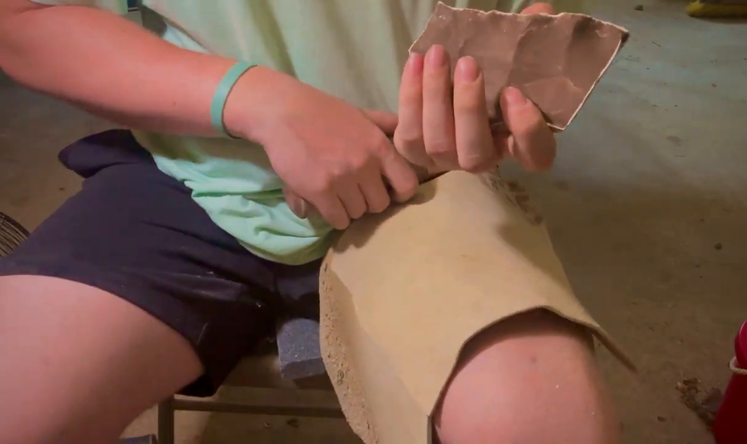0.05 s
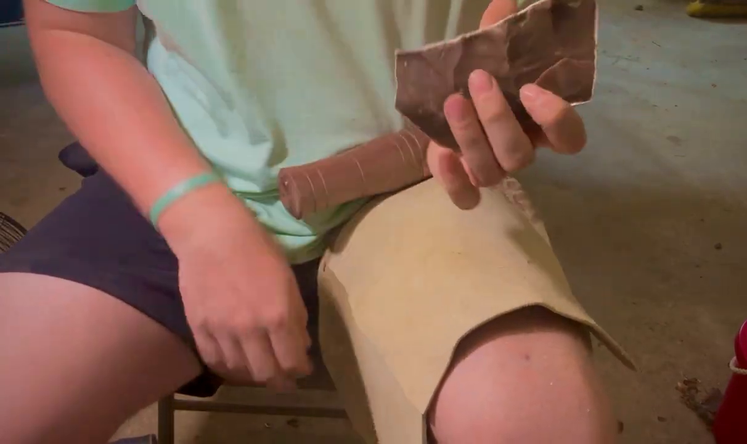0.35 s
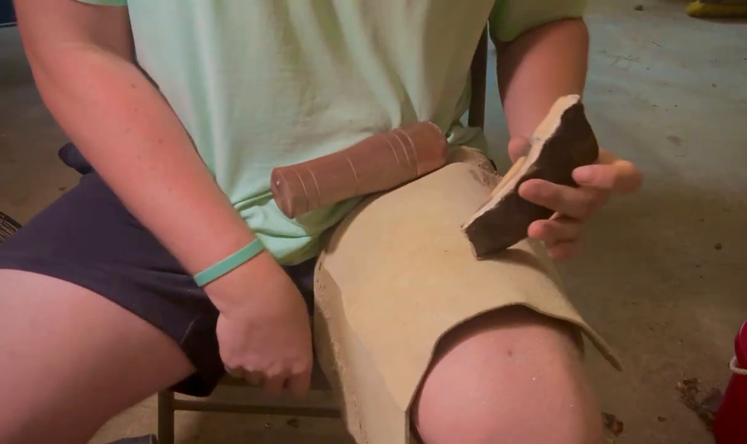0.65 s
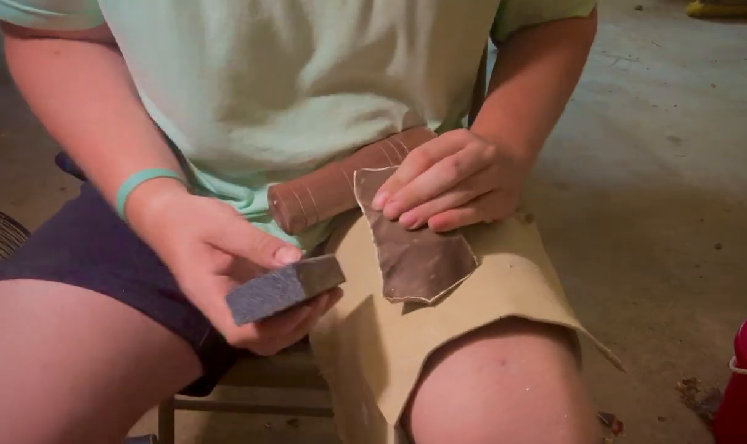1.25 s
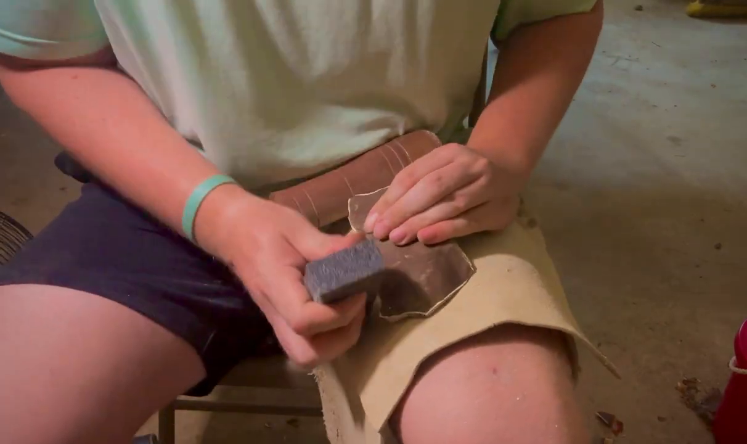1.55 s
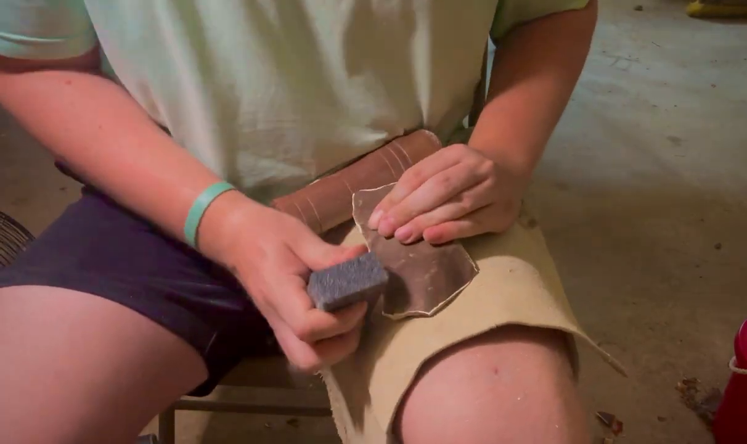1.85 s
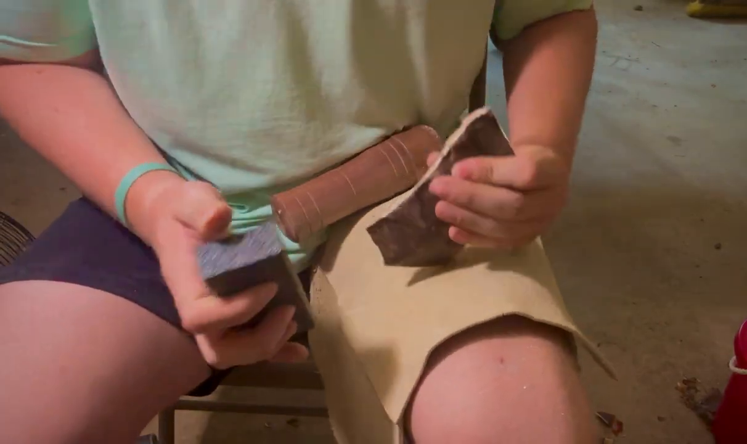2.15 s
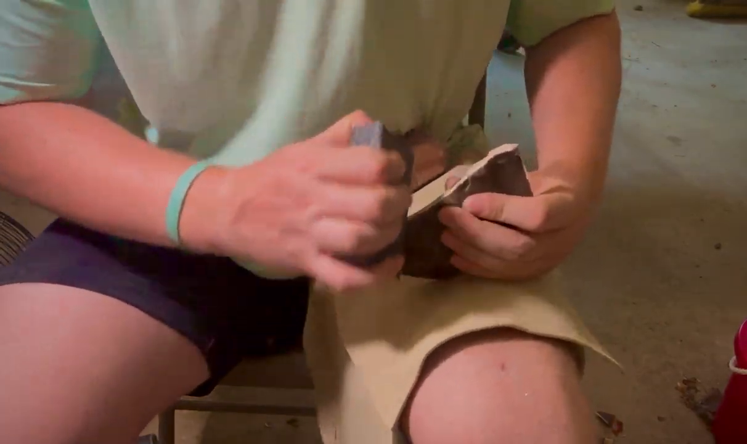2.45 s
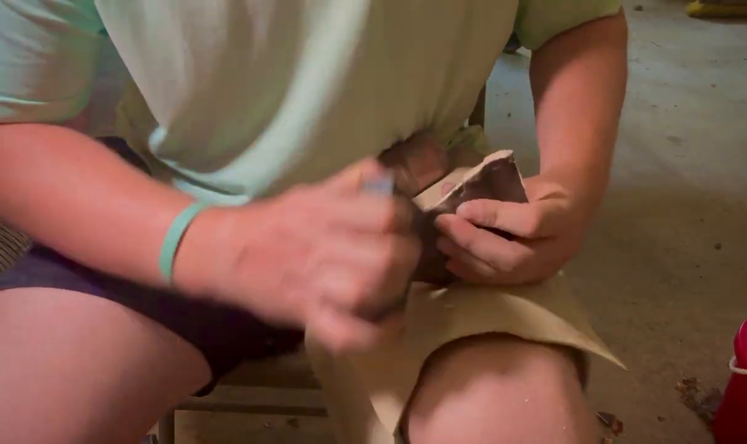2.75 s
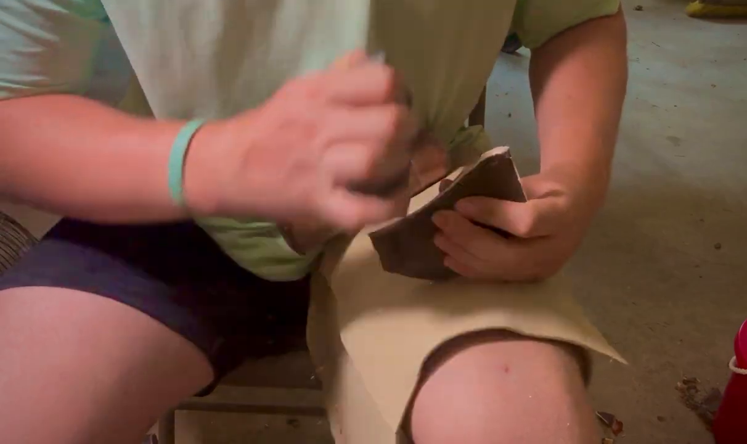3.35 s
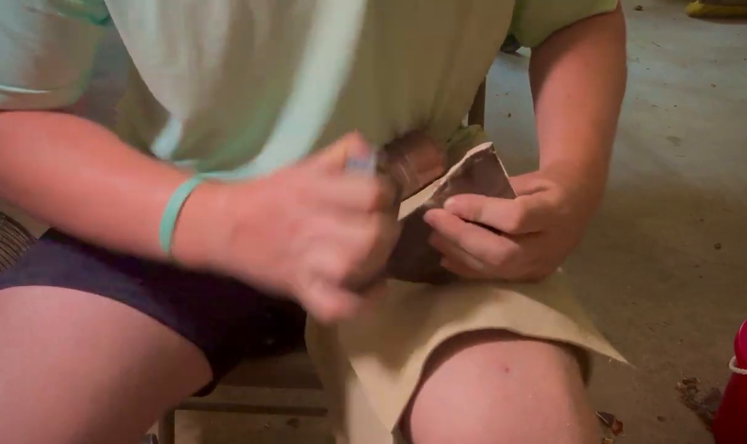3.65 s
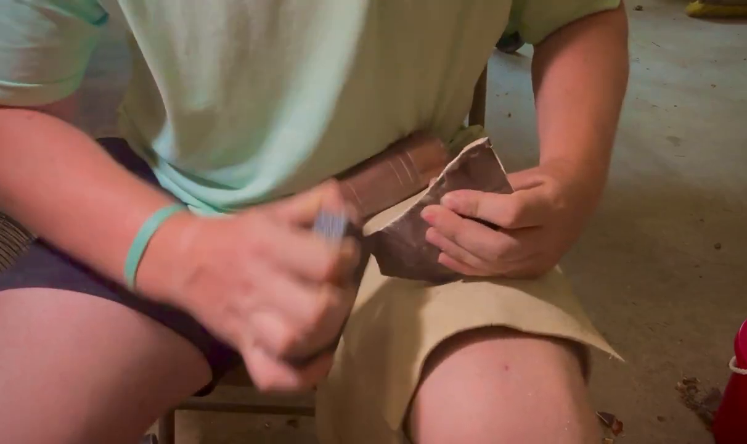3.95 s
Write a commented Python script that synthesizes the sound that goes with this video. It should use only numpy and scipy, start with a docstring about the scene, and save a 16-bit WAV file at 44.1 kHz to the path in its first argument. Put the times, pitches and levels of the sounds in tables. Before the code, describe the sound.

An abrasive block scrapes a stone's edge, close by in a workshop. From 0.5 to 1 second the stone slides on leather with a rising hollow note, followed by light taps. Two gritty strokes land at 1.5 and 1.8 seconds, then seven more, about four a second, from 2.4 to 3.9, each with a knock and thin ring. Soft bumps, clothes rustle and steady hiss lie underneath.

```python
"""Abrading a stone's edge

In a workshop, a flat stone is turned in the hand and slides on a leather lap pad with a rising hollow note.
An abrasive block lands on its edge nine times: a knock, a short skip, then a gritty scrape that makes
the stone ring thinly. Hands and pad bump softly in between, over a steady room hiss."""
import sys
import numpy as np
from scipy import signal
from scipy.fft import rfft, irfft
from scipy.io import wavfile

SR = 44100
rng = np.random.default_rng(int(sys.argv[2]) if len(sys.argv) > 2 else 0)


def to_wav(s):
    """Save 16-bit WAV."""
    ch = np.atleast_2d(s).T  # columns
    pcm = np.round(np.clip(ch, -1, 1) * 32767)  # PCM
    wavfile.write(sys.argv[1], SR, pcm.astype(np.int16))


N = 176400
TIME, BIN_HZ = np.arange(N) / SR, np.fft.rfftfreq(N, 1 / SR)

# Tone of the room hiss: freq_hz, gain_db
HISS_EQ = [(25, -21), (55, 4.5), (130, -6.5), (300, -3.5), (600, -6.5), (1000, -8), (2000, -11),
           (3000, -14), (4000, -17), (5500, -24.5), (8000, -30), (15000, -28)]
# How alike left and right are in hiss, rustle and bumps: freq_hz, correlation
STEREO_LIKENESS = [(50, 0.05), (300, 0.27), (1000, 0.065), (4000, .1)]
# Fader curve of the clothes: time_s, level_db
RUSTLE_CURVE = [(0, -56.5), (.45, -63), (1.05, -51.5), (1.5, -49), (1.9, -50.5), (2.3, -49), (4, -54)]
# Their tone: freq_hz, gain_db
RUSTLE_EQ = [(25, -24), (65, -3), (140, -7.5), (250, -8), (500, -12.5), (2000, -22.5), (10000, -45)]
# Light taps on the stone: start_s, level_db
TAP_CUES = [(0.233, -45.5), (1.472, -42.5), (1.498, -39.5), (1.512, -42)]
# Tone of contact with the stone lying flat: freq_hz, gain_db
FLAT_EQ = [(200, -21), (600, -3.5), (900, -3.5), (1300, 2.5), (1600, -3), (2000, -3.5), (3000, -11.5),
           (4500, -18), (6500, -24.5), (12000, -54), (15000, -28)]
# The stone's thin ring: pitch_hz, width_hz, gain_db
STONE_MODES = [(8275, 68, -5), (10645, 79, -3.5), (12120, 33, -22), (16500, 270, -34)]
# Fader curve of the slide: time_s, level_db
SLIDE_CURVE = [(.494, -46), (.512, -31.5), (.555, -36), (.605, -41.5), (.665, -29.5), (.697, -31.5),
               (.712, -34.5), (.735, -34.5), (.779, -35.5), (.784, -25), (.795, -30), (.822, -25.5),
               (.85, -34.5), (.92, -42.5), (1.02, -56.5)]
# Its tone: freq_hz, gain_db
SLIDE_EQ = [(100, -32), (200, -5.5), (330, 0), (550, 0.5), (800, -3.5), (1200, -9.5), (1700, -8),
            (2500, -10), (5000, -15.5), (8000, -17), (12000, -15.5), (15500, -18)]
# Hollow resonance in mid-slide: time_s, pitch_hz, level_db
HOLLOW_SWEEP = [(.60, 560, -51), (.645, 590, -31.5), (0.696, 660, -24), (0.706, 720, -36.5),
                (.738, 760, -29.5), (.78, 900, -34), (0.851, 1040, -39)]
# Bumps on the lap: start_s, level_db
BUMP_CUES = [(.55, -38), (1.045, -38), (1.24, -45.5), (1.41, -39), (2.195, -42), (2.301, -41), (2.386, -38),
             (2.614, -34), (3.14, -48)]
# Their tone: freq_hz, gain_db
BUMP_EQ = [(25, -25), (70, 9), (130, 1), (220, -7.5), (400, -30.5), (1500, -51)]
# Sharp clicks: start_s, level_db
SNAP_CUES = [(1.039, -41.5), (1.593, -25), (1.609, -24), (2.74, -28), (2.979, -26), (3.664, -29)]
# Touches on the block: start_s, level_db
CLINK_CUES = [(1.338, -42), (1.39, -43)]
# The block's ring: pitch_hz, width_hz, gain_db
BLOCK_MODES = [(7700, 14, -0.36), (12000, 29, -0.68)]
# Strokes of the block, the last three columns being sends to the body and the two lowest stone modes:
# land_s, knock_db, bite_s, leave_s, scrape_db, body_db, lower_ring_db, upper_ring_db
STROKE_CUES = [(1.542, -36, 1.550, 1.641, -26.5, -10, -13.5, 4),
               (1.808, -18, 1.820, 1.9057, -24.5, -16.5, -8.5, -0.5),
               (2.441, -27, 2.472, 2.53, -28, -4, -7.5, -6),
               (2.703, -26.5, 2.734, 2.778, -24.5, 0.5, 1.5, -5.5),
               (2.964, -28.5, 2.966, 3.017, -24.5, -1, -0.5, -8.5),
               (3.198, -20.5, 3.212, 3.244, -24.5, -4, 8, 0.5),
               (3.423, -18.5, 3.44, 3.473, -21.5, -2.5, 0.5, -9.5),
               (3.639, -25.5, 3.657, 3.695, -25, 2.5, 1.5, 0.5),
               (3.863, -22.5, 3.85, 3.929, -25, 2, -0.5, 3.5)]
# Tone of each landing's first tick: freq_hz, gain_db
TICK_EQ = [(400, -30), (1200, 17), (2200, 2), (3600, -7), (6000, -13), (15000, -7)]
# Low body of stone and leg: freq_hz, gain_db
BODY_EQ = [(30, -50), (160, -14), (270, -1.5), (400, -0.5), (500, -8), (620, -2.5), (900, -18.5),
           (2000, -38)]
# Tone of contact with the stone tilted: freq_hz, gain_db
TILTED_EQ = [(200, -18.5), (600, -1.5), (1000, -2.5), (1400, -2), (1900, 3), (2500, -3.5), (3200, -6),
             (3900, -6.5), (6000, -15), (9000, -28), (12000, -14), (14500, -47)]
# Time for the reverb tail to fall 60 dB: freq_hz, decay_s
REVERB_DECAY = [(200, 0.42), (530, 0.66), (1400, 0.56), (3700, .65), (9700, .5), (15000, 0.22)]
# Tone of that tail: freq_hz, gain_db
REVERB_EQ = [(100, -1), (350, -6), (600, -5.5), (1000, -12.5), (2500, -6.5), (8000, -12.5), (14000, -14.5)]

TILT_S = 2.2  # from here on the stone is tilted up and braced on the leg
CONTACT_TRIM_DB, CLICK_FALL_S = -1, 0.00071


def from_db(db):
    """Decibels to gain."""
    return 10 ** (np.asarray(db) / 20)


def unit_power(x):
    """Scale to an RMS of one."""
    return x / np.sqrt(np.mean(x ** 2) + 1e-20)


def curve(points):
    """Join (time_s, value) points with straight lines."""
    return np.interp(TIME, *np.transpose(points))


def at_hz(points, hz):
    """Read (freq_hz, value) points on a log axis."""
    freqs, values = np.transpose(points)
    return np.interp(np.log(np.maximum(hz, 1)), np.log(freqs), values)


def eq(x, points, size=4096):
    """Minimum-phase equaliser; white noise keeps its power."""
    cepstrum = irfft(np.log(from_db(at_hz(points, np.fft.rfftfreq(size, 1 / SR)))))
    cepstrum[1:size // 2] *= 2
    cepstrum[size // 2 + 1:] = 0
    response = irfft(np.exp(rfft(cepstrum)))
    return signal.fftconvolve(x, response / np.linalg.norm(response))[:N]


def resonator(hz, width_hz):
    """Coefficients of a resonance; white noise keeps its power."""
    r = np.exp(-np.pi * width_hz / SR)
    return np.sqrt((1 - r * r) / 2) * np.array([1, 0, -1]), [1, -2 * r * np.cos(2 * np.pi * hz / SR), r * r]


def drift(rate_hz):
    """Smooth random wobble of unit power."""
    r = np.exp(-2 * np.pi * rate_hz / SR)
    return unit_power(signal.lfilter([1], [1, -2 * r, r * r], rng.standard_normal(N + SR))[SR:])


def release(start_s, fall_s):
    """Envelope that holds at one, then dies away."""
    return np.exp(-np.maximum(TIME - start_s, 0) / fall_s)


def hit(start_s, fall_s):
    """Envelope that jumps up and dies away."""
    return (TIME >= start_s) * release(start_s, fall_s)


def hits(cues, fall_s):
    """One hit for each (start_s, level_db) cue."""
    return sum(from_db(db) * hit(start_s, fall_s) for start_s, db in cues)


def scattered(force):
    """Grains touch at different spots, so each pushes a mode one way or the other."""
    return force * rng.choice([-1, 1], N) + 1e-18


def ring(modes, drives):
    """Ringing modes, each excited by its own force."""
    return sum(from_db(db) * signal.lfilter(*resonator(hz, width_hz), scattered(drive))
               for (hz, width_hz, db), drive in zip(modes, drives))


def grit(grains_per_s, spread_db=4, chatter_db=2.5):
    """Dense clicks of uneven size, bunched by the chatter of the contact."""
    sizes = from_db(spread_db * np.minimum(rng.exponential(1, N), 4)) * rng.choice([-1, 1], N)
    clicks = sizes * (rng.random(N) < grains_per_s / SR)
    return unit_power(clicks * from_db(chatter_db * drift(rate_hz=185)))


def wide_noise(tone):
    """Wide stereo noise, a little narrower in the low mids."""
    alike = at_hz(STEREO_LIKENESS, BIN_HZ)
    mid, side = (irfft(rfft(eq(rng.standard_normal(N), tone)) * np.sqrt(1 + sign * alike), N)
                 for sign in (1, -1))
    return np.array([mid + side, mid - side])


def pan_right(x, lead_s):
    """The sound reaches the right ear first."""
    left = irfft(rfft(x) * np.exp(-2j * np.pi * BIN_HZ * lead_s), N)
    return np.array([left, x])


def room_hiss():
    """A steady, dark bed of noise."""
    return from_db(-53) * wide_noise(HISS_EQ)


def clothes_rustle(waver_db=2.15):
    """Clothes rustle dully at an uneven level."""
    return from_db(curve(RUSTLE_CURVE) + waver_db * drift(rate_hz=13)) * wide_noise(RUSTLE_EQ)


def stone_taps(ring_db=-6.5):
    """Fingers and block tap the stone: a puff of noise and a faint ring."""
    taps = hits(TAP_CUES, fall_s=0.0081) * rng.standard_normal(N)
    ringing = from_db(ring_db) * ring(STONE_MODES, [taps] * 4)
    return from_db(CONTACT_TRIM_DB) * eq(taps, FLAT_EQ) + ringing


def workshop_reverb(x, early_db=-4, early_fall_s=0.0052, build_s=0.036):
    """One side of the room: quick reflections off lap and floor, then a tail that dies band by band."""
    t, hz = TIME[:SR], np.fft.rfftfreq(SR, 1 / SR)
    white = rfft(rng.standard_normal(SR))
    early = rng.standard_normal(SR) * np.exp(-t / early_fall_s) * (t > .001)
    response = from_db(early_db) * early / np.linalg.norm(early)
    edges_hz = np.geomspace(60, 17000, 13)
    for low, high in zip(edges_hz, edges_hz[1:]):
        centre_hz = np.sqrt(low * high)
        band = irfft(white * (hz >= low) * (hz < high), SR)
        tail = from_db(-60 * t / at_hz(REVERB_DECAY, centre_hz)) * np.minimum(t / build_s, 1)
        response += from_db(at_hz(REVERB_EQ, centre_hz)) * band * tail / np.linalg.norm(tail)
    return signal.fftconvolve(x, response)[:N]


def leather_slide(hop=128):
    """Soft friction of stone on skin and leather, with a hollow resonance that rises as it turns."""
    times, pitches, levels = np.transpose(HOLLOW_SWEEP)
    pitch_hz = np.interp(TIME, times, pitches)
    swell = from_db(np.interp(TIME, times, levels)) * (TIME > times[0]) * (TIME < times[-1])
    friction = swell * grit(grains_per_s=11000) + 1e-18
    hollow, state = np.zeros(N), np.zeros(2)
    for i in range(0, N, hop):
        b, a = resonator(pitch_hz[i], width_hz=150)
        hollow[i:i + hop], state = signal.lfilter(b, a, friction[i:i + hop], zi=state)
    fader = from_db(curve(SLIDE_CURVE)) * (TIME > SLIDE_CURVE[0][0]) * (TIME < SLIDE_CURVE[-1][0])
    rub = eq(fader * rng.standard_normal(N), SLIDE_EQ)
    return from_db(-2) * rub + from_db(-.5) * hollow


def lap_bumps(rise_s=0.0033, fall_s=0.017):
    """Hands and pad land on the lap with soft, bassy thuds."""
    thuds = sum(from_db(db) * np.clip((TIME - start_s) / rise_s, 0, 1) * release(start_s + rise_s, fall_s)
                for start_s, db in BUMP_CUES)
    return thuds * wide_noise(BUMP_EQ)


def grain_snaps():
    """Sharp clicks, as of coarse grains breaking."""
    return 2 * hits(SNAP_CUES, CLICK_FALL_S) * rng.standard_normal(N)


def block_clinks():
    """Light touches set the block ringing as it is picked up."""
    return ring(BLOCK_MODES, [hits(CLINK_CUES, CLICK_FALL_S)] * 2)


def scrape_pressure(land_s, bite_s, leave_s, skip_db=-15, grip_s=.008, easing_db_per_s=26):
    """The block skips lightly until it bites, eases along the stroke and lifts off."""
    grip = np.clip((TIME - bite_s) / grip_s + .5, 0, 1)
    from_middle_s = np.clip(TIME, bite_s, leave_s) - (bite_s + leave_s) / 2
    touching = (TIME >= land_s) * release(leave_s, fall_s=0.0075)
    return touching * from_db(skip_db * (1 - grip) - easing_db_per_s * from_middle_s)


def block_strokes(body_lag_s=.002):
    """Each knock and gritty scrape drives contact noise, the body of stone and leg, and the stone's ring."""
    flat, tilted, body, lower, upper, ticks = np.zeros((6, N))
    grains, crunch = grit(grains_per_s=4500), rng.standard_normal(N)
    for land_s, knock_db, bite_s, leave_s, scrape_db, body_db, lower_db, upper_db in STROKE_CUES:
        ticks += from_db(knock_db - 7) * hit(land_s, fall_s=0.0024)
        knock = 2 * from_db(knock_db) * hit(land_s, fall_s=0.0025) * crunch
        scrape = from_db(scrape_db) * scrape_pressure(land_s, bite_s, leave_s) * grains
        stroke = knock + scrape
        if land_s < TILT_S:
            flat += stroke
        else:
            tilted += stroke
        body += from_db(body_db) * (from_db(.5) * knock + scrape)
        lower += from_db(lower_db) * stroke
        upper += from_db(upper_db) * stroke
    attack = eq(ticks * rng.standard_normal(N), TICK_EQ)
    contact = from_db(CONTACT_TRIM_DB) * (eq(flat, FLAT_EQ) + eq(tilted, TILTED_EQ))
    weight = from_db(-4.5) * eq(np.roll(scattered(body), int(body_lag_s * SR)), BODY_EQ)
    return attack + contact + weight + ring(STONE_MODES, [lower, upper, flat + tilted, flat + tilted])


def scene():
    """Close stone work, further right once tilted, with reverb over bumps, rustle and hiss."""
    work = stone_taps() + grain_snaps() + block_clinks() + block_strokes()
    slide = leather_slide()
    direct = pan_right(slide, lead_s=.00002)
    direct += pan_right(work * (TIME < TILT_S), lead_s=.00005)
    direct += pan_right(work * (TIME >= TILT_S), lead_s=.00012)
    reverb = np.array([workshop_reverb(work + slide) for side in range(2)])
    return direct + reverb + lap_bumps() + clothes_rustle() + room_hiss()


def record(dry):
    """The right channel's treble is the left one's, inverted and slightly late; the top is cut steeply."""
    crossover_hz, lag_s, cutoff_hz = 6700, .000206, 15800
    left, right = rfft(dry)
    late_left = left * np.exp(-2j * np.pi * BIN_HZ * lag_s)
    crossfade = np.pi / 2 * np.clip(2 * np.log2(np.maximum(BIN_HZ, 1) / crossover_hz) + .5, 0, 1)
    right = np.cos(crossfade) * right - np.sin(crossfade) * late_left
    high_cut = signal.ellip(10, .3, 80, cutoff_hz, fs=SR, output="sos")
    return signal.sosfilt(high_cut, irfft(np.array([left, right]), N))


dry = scene()
out = record(dry)
to_wav(out)
```